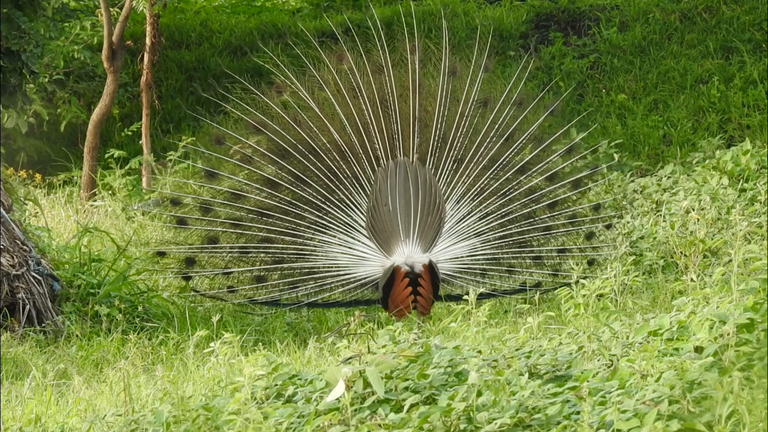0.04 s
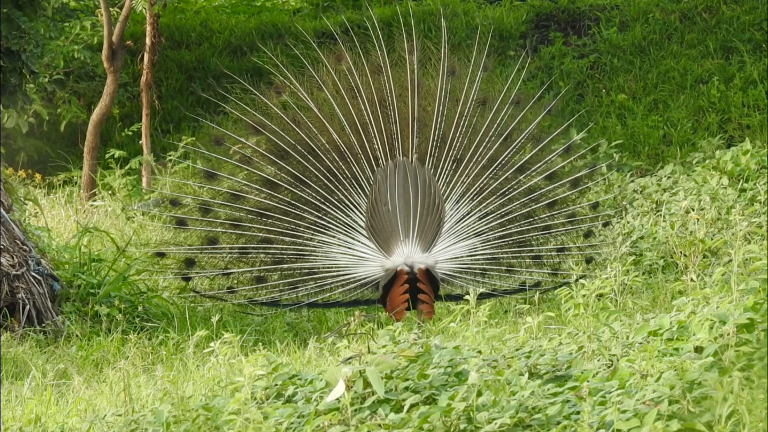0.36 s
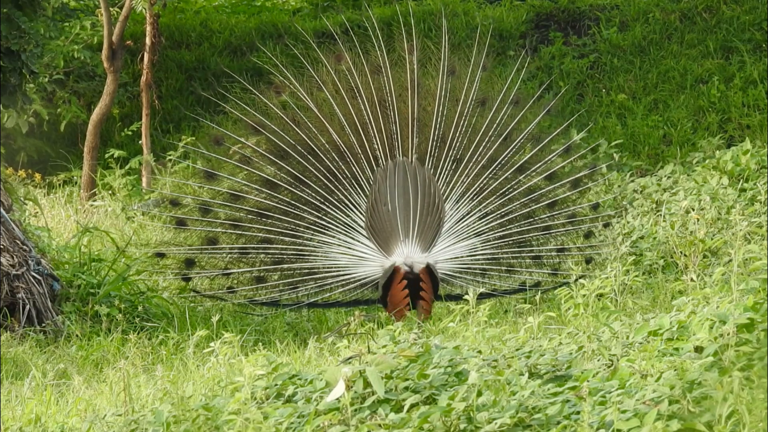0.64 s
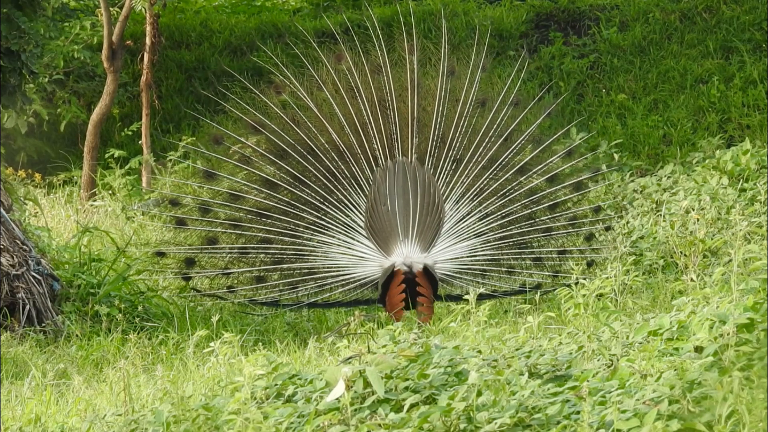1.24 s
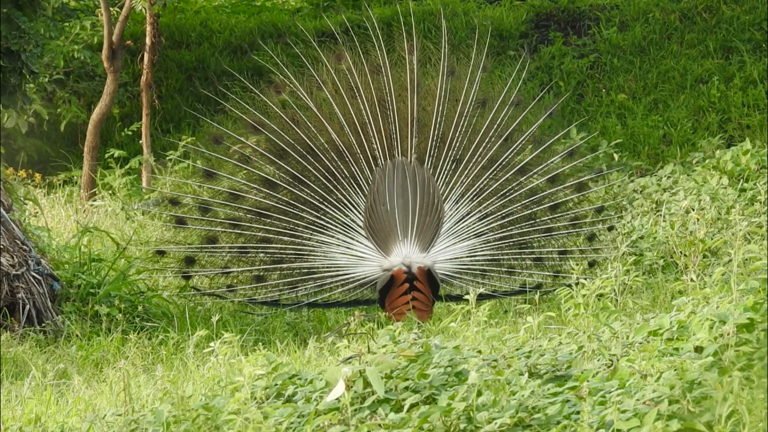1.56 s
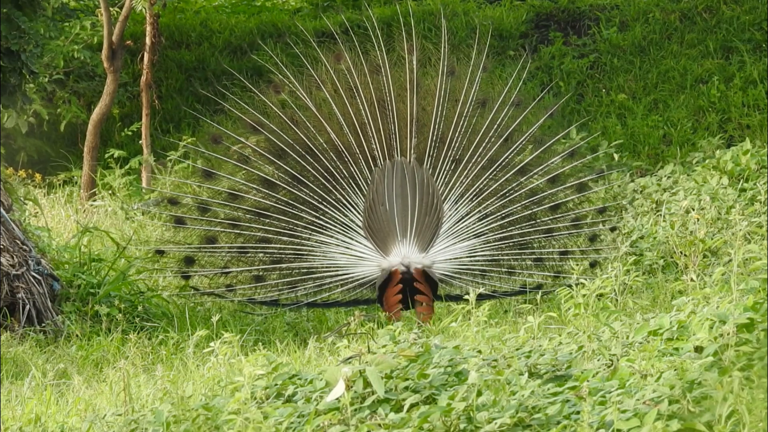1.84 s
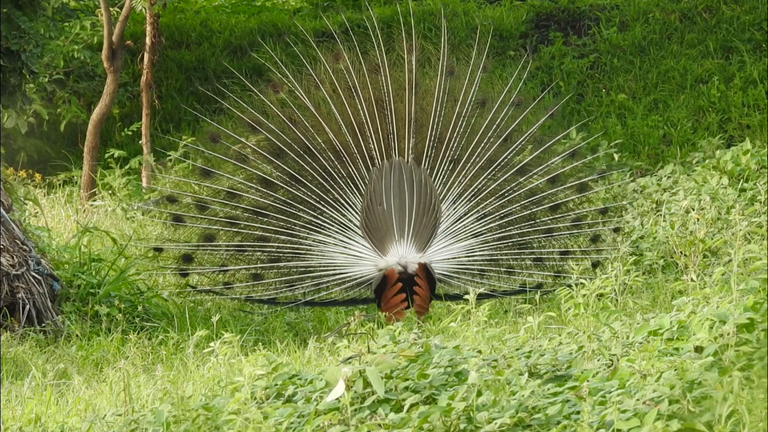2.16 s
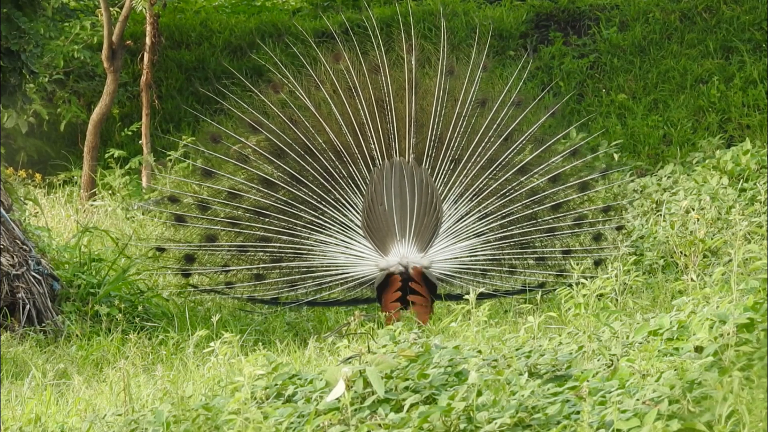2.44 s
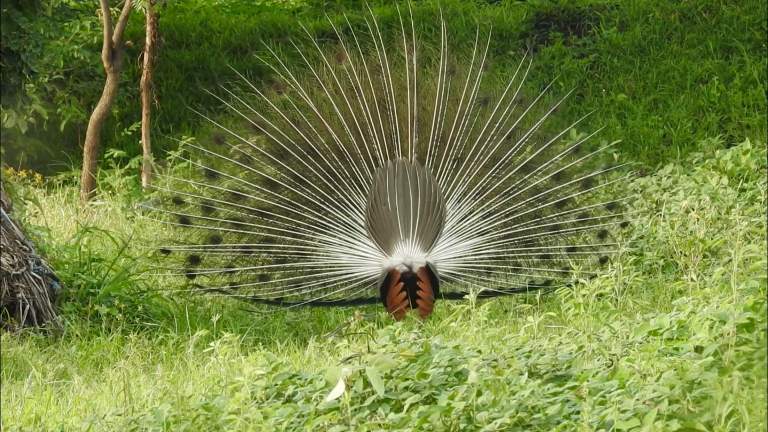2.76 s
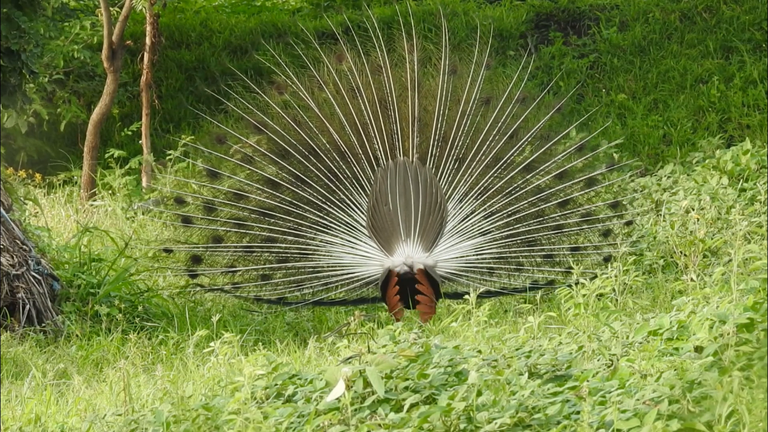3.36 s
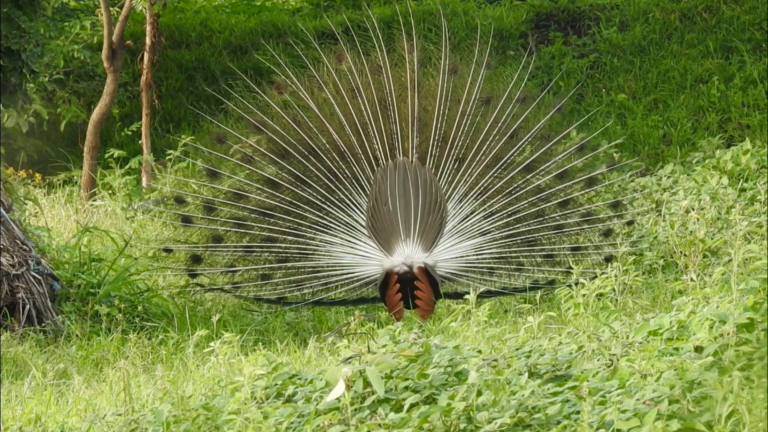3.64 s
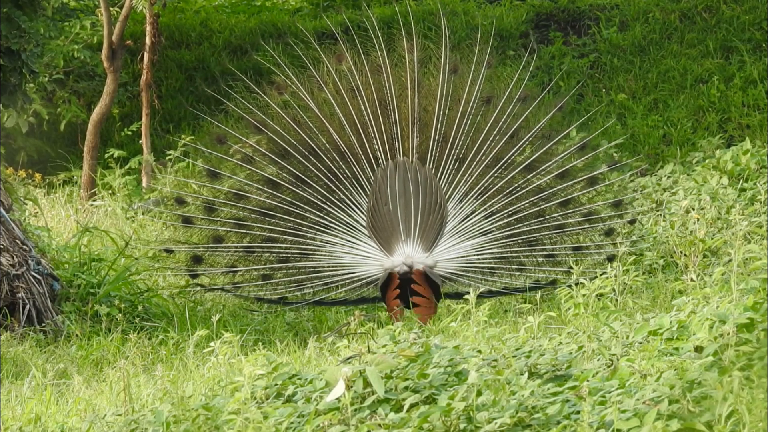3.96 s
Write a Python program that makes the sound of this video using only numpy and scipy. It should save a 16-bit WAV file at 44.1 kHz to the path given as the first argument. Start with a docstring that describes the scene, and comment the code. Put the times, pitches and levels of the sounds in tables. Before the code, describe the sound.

A peacock's fanned feathers rustle, swish and tick, with one sharp snap midway, then settle. Behind them a distant engine thuds rapidly and fades, while insects hiss and a small bird repeats falling notes. Stereo, in a meadow.

```python
"""A peacock holds up its fanned train in a meadow; its feathers rustle and now and then swish or snap.
Far off something thuds about 17 times a second, most likely a single-cylinder engine,
speeding up a little as it fades. Insects hiss and trill in the grass over a faint low rumble,
and a small bird repeats soft falling notes. Two spaced microphones listen."""
import sys
import numpy as np
from scipy import signal
from scipy.fft import rfft, irfft
from scipy.io import wavfile

SR = 44100
rng = np.random.default_rng(int(sys.argv[2]) if len(sys.argv) > 2 else 0)


def wav_record(signal):
    """Record a signal, one row per channel, as 16-bit PCM in the file named by sys.argv[1]."""
    frames = np.transpose(np.atleast_2d(signal))
    bounded = np.clip(frames, -1, 1)
    # unit amplitude maps onto the largest positive 16-bit level
    quanta = np.round(bounded * 32767).astype(np.int16)
    wavfile.write(sys.argv[1], SR, quanta)


N = 176400
T = np.arange(N) / SR  # time of each sample [s]
FREQS = np.arange(N // 2 + 1) * SR / N  # frequency of each point in a spectrum [Hz]


def from_db(db):
    """Turn decibels into a number to multiply by."""
    return 10 ** (np.asarray(db) / 20)


def unit_power(x):
    """Scale a sound so that its average power is 1."""
    return x / np.sqrt(np.mean(x ** 2) + 1e-20)


def over_time(rows):
    """Join a table's timed rows with straight lines: one curve for each value column."""
    times, *columns = np.transpose(rows)
    return [np.interp(T, times, column) for column in columns]


def over_frequency(rows):
    """Join (frequency, value) rows with straight lines on a log-frequency axis."""
    hz, value = np.transpose(rows)
    return np.interp(np.log(FREQS + 1), np.log(hz), value)


def drift(rate_hz):
    """A smooth random wobble of about size 1; a higher rate wobbles faster."""
    step, warm_up = 40, 2000
    pole = np.exp(-2 * np.pi * rate_hz * step / SR)
    white = rng.standard_normal(N // step + warm_up + 2)
    slow = signal.lfilter([1], [1, -2 * pole, pole * pole], white)[warm_up:]
    return np.interp(np.arange(N) / step, np.arange(len(slow)), unit_power(slow))


def keep_band(x, hz, kind, order):
    """Let only the lows, the highs or one band through."""
    return signal.sosfilt(signal.butter(order, hz, kind, fs=SR, output="sos"), x + 1e-18)


def ring(x, hz, *widths_hz):
    """Make a sound ring at one pitch, once for each width; narrower rings longer."""
    for width in widths_hz:
        x = signal.lfilter(*signal.iirpeak(hz, hz / width, SR), x + 1e-18)
    return x


def stroke(start, attack, decay):
    """A loudness curve that rises quickly, then dies away."""
    age = T - start
    return np.clip(age / attack, 0, 1) * np.exp(-np.clip((age - attack) / decay, 0, 30))


def colour(source, spectrum):
    """Turn two unrelated signals into a partly alike left and right with this spectrum."""
    # how alike the two microphones sound: (frequency [Hz], likeness [0-1])
    likeness = [(100, .99), (500, .98), (1300, .95), (2400, .76), (4500, .6), (7000, .62), (12000, .55)]
    alike = over_frequency(likeness)
    high_fade = 1 / (1 + (FREQS / spectrum[-1][0] / 2) ** 4)
    low_fade = 1 / (1 + (spectrum[0][0] / 2 / (FREQS + 1)) ** 4)
    mid, side = rfft(source) * from_db(over_frequency(spectrum)) * high_fade * low_fade
    pair = np.sqrt(1 + alike) * mid + np.sqrt(1 - alike) * side * [[1], [-1]]
    return unit_power(irfft(pair, N))


def noise(spectrum):
    """Smooth stereo noise with this spectrum."""
    return colour(rng.standard_normal((2, N)), spectrum)


def spread(mid, side, side_db):
    """A sound that arrives by many paths differs a little between the microphones."""
    return mid + from_db(side_db) * side * np.array([[1], [-1]])


def leaf_echo(x, fade_s):
    """Leaves and trunks give back a blurred echo that falls 60 dB in fade_s."""
    tail = unit_power(rng.standard_normal(N) * from_db(-60 * T / fade_s)) / np.sqrt(N)
    return signal.fftconvolve(x, tail)[:N]


def left_late(pair, lag_s):
    """A sound from the right of centre reaches the left microphone later."""
    left, right = np.broadcast_to(pair, (2, N))
    delay = np.exp(-2j * np.pi * FREQS * lag_s)
    return np.array([irfft(rfft(left) * delay, N), right])


def feather_rustle():
    """Vanes, the soft flat parts of feathers, rub in a hiss dotted with tiny ticks."""
    # tone of the rustle: (frequency [Hz], relative level [dB])
    spectrum = [(2500, -8.5), (3900, -6), (4200, 2.5), (5200, -3.5), (6300, 3), (7200, -3.5), (8200, -7.5),
                (10000, -15.5), (12000, -29.5), (15000, -92)]
    # how much the train stirs: (time [s], level [dB])
    stir = [(0, -38), (.13, -38), (.38, -40), (.6, -37.5), (.85, -44), (1.06, -35.5), (1.3, -46.5),
            (1.55, -44.5), (1.78, -42), (2, -41), (2.13, -48.5), (2.42, -43.5), (2.6, -42.5), (2.75, -48),
            (3.3, -61), (4, -76)]
    ticks_per_s, tick_gain = 260, 0.28
    ticks = rng.standard_normal((2, N)) * (rng.random(N) < ticks_per_s / SR)
    level = from_db(over_time(stir)[0] + 0.86 * drift(5.7))
    return level * (noise(spectrum) + tick_gain * colour(ticks, spectrum))


def feather_shafts():
    """Stiff shafts tap each other at random and ring; now and then one rubs harder."""
    # pitches the shafts ring at: (pitch [Hz], width [Hz], relative level [dB])
    pitches = [(824, 140, -19), (1250, 72, 3), (1393, 61, -0.5), (1534, 200, 1), (1725, 40, 0.5),
               (1970, 30, -3), (2112, 100, 2.5), (2523, 31, -1)]
    # loudness of the rattling: (time [s], level [dB])
    rattle_level = [(0, -50), (1.4, -48), (2.2, -45.5), (2.8, -48), (4, -60)]
    # harder rubs: (time [s], attack [s], decay [s], pitch [Hz], width [Hz], level [dB])
    rubs = [(0.048, 0.013, 0.096, 1960, 410, -37.5), (0.309, 0.02, 0.072, 870, 300, -43.5),
            (.562, 0.022, 0.01, 2210, 220, -33.5), (0.944, 0.0054, 0.01, 1300, 222, -31.5),
            (1.753, .002, 0.015, 2130, 298, -34), (1.769, .0016, 0.023, 1250, 400, -39.5),
            (2.246, 0.0058, 0.016, 1460, 700, -34), (2.4965, 0.0065, 0.02, 1890, 170, -30),
            (2.541, 0.0018, 0.028, 1830, 260, -31), (2.756, 0.011, 0.024, 1530, 300, -38),
            (3.027, 0.0031, 0.044, 2960, 900, -41), (3.444, 0.0037, .011, 1125, 220, -39.5)]
    taps_per_s = 260
    taps = rng.random(N) < taps_per_s / SR
    rattle = 0
    for hz, width, db in pitches:
        tone = ring(taps * rng.standard_normal(N), hz, width, hz / 2)
        rattle += from_db(db) * unit_power(tone)
    out = from_db(over_time(rattle_level)[0]) * unit_power(rattle)
    for start, attack, decay, hz, width, db in rubs:
        tone = ring(rng.standard_normal(N), hz, width, 2 * width)
        out += from_db(db) * stroke(start, attack, decay) * unit_power(tone)
    return out


def insects():
    """Insects hiss steadily, with a narrow trill and one thin whine standing out."""
    # tone of the hiss: (frequency [Hz], relative level [dB])
    spectrum = [(3000, -9), (3900, -8), (4300, 1), (5200, -0.5), (6000, 5.5), (6600, 5.5), (7200, 4),
                (8000, -9), (9200, -8.5), (10500, -14.5), (12000, -39.5)]
    # loudness of one insect's whine: (time [s], level [dB])
    whine_level = [(2.6, -53), (3.05, -46), (3.25, -50), (3.41, -37), (3.5, -48)]
    pitch_hz = 6530
    trill_shape = [(-320, -60), (-80, -4), (0, 0), (80, -4), (320, -60)]  # (offset [Hz], level [dB])
    trill = from_db(-49.5) * noise([(pitch_hz + offset, db) for offset, db in trill_shape])
    whine = np.sin(2 * np.pi * np.cumsum(pitch_hz + 40 * drift(40)) / SR)
    whine *= from_db(over_time(whine_level)[0] + 2 * drift(22))
    hiss = from_db(-40 + drift(7)) * noise(spectrum)
    return hiss + trill + whine


def low_rumble():
    """A faint, steady rumble lies under everything."""
    # tone of the rumble: (frequency [Hz], relative level [dB])
    spectrum = [(20, -25), (45, -7), (100, 8), (200, 10), (350, -11), (600, -42)]
    return from_db(-47.5) * noise(spectrum)


def engine_clatter(cycles):
    """A far ringing clatter throbs with the firings and changes tone as the engine fades."""
    # loudness of its two tone colours: (time [s], early level [dB], late level [dB])
    colour_levels = [(0, -45.5, -74), (.6, -45, -53), (1.4, -51, -58), (2.2, -46.5, -72),
                     (2.45, -55.5, -44), (2.8, -52, -52), (3.2, -61, -47), (4, -72, -42)]
    # pitches it rings at: (pitch [Hz], gain in early colour [dB], gain in late colour [dB])
    pitches = [(388, -1.5, -23), (477.8, 7, 1), (550, -4.5, -10), (668, -2.5, 4.5), (783, -1, -34),
               (1250, 5.5, -9), (1391, -2, -1.5), (1872, -13, -0.5), (2155, 2, -1.5), (2630, -7, -27)]
    # broad noise under the ringing: (frequency [Hz], relative level [dB])
    wash = [(300, 1), (500, -7.5), (900, -7.5), (1300, -2), (2100, -25), (3100, -9.5), (5000, -49)]
    width_hz, waver_db, throb_depth = 45, 2.5, 0.16
    early, late = from_db(over_time(colour_levels))
    ringing = 0
    for hz, early_db, late_db in pitches:
        shaking = spread(*rng.standard_normal((2, N)), side_db=-15.5)
        tone = unit_power(ring(shaking, hz, width_hz, hz / 5))
        level = np.hypot(early * from_db(early_db), late * from_db(late_db))
        ringing += tone * level * from_db(waver_db * drift(10.5))
    clatter = ringing / np.sqrt(len(pitches)) + from_db(-51) * noise(wash)
    return clatter * (1 + throb_depth * np.cos(2 * np.pi * (cycles - .13)))


def engine_exhaust(cycles):
    """Each firing draws a little air, then puffs through muffler and pipe; some knock harder."""
    # strength of the puffs: (time [s], level [dB])
    puff_level = [(0, -14.5), (.8, -16.5), (1.8, -18.5), (2.5, -20.5), (4, -22.5)]
    # firings that knock hard: (rough time [s], level [dB])
    hard_knocks = [(.205, -30), (.45, -29), (.51, -28.5), (.63, -27.5), (1.265, -28.5), (1.325, -27),
                   (1.615, -31.5), (1.79, -29.5), (2.135, -26.5), (2.625, -27.5), (2.9, -31), (3.005, -28),
                   (3.06, -29), (3.11, -27), (3.535, -32.5)]
    jitter_s, puff_spread_db, knock_spread_db, inrush_lead_s = .0003, .8, 4, .007
    pipe_hz, pipe_width_hz, knock_hz, knock_width_hz = 168, 72, 304, 177
    firings = np.interp(np.arange(int(cycles[-1]) + 1), cycles, T)
    time_luck, puff_luck, knock_luck = rng.standard_normal((len(firings), 3)).T
    at = np.clip(((firings + jitter_s * time_luck) * SR).astype(int), 0, N - 1)
    puffs, knocks = np.zeros((2, N))
    puffs[at] = from_db(over_time(puff_level)[0][at] + puff_spread_db * puff_luck)
    knocks[at] = puffs[at] * from_db(-24 + knock_spread_db * np.minimum(knock_luck, 2))
    for when, db in hard_knocks:
        nearest = np.argmin(np.abs(firings - when))
        knocks[at[nearest]] = from_db(db)
    inrush = from_db(-15) * np.interp(T + inrush_lead_s, T, puffs)
    # Shape one thud and one knock from a click, then play them at every firing.
    click = 1. * (T == 0)
    muffled = keep_band(keep_band(click, 222, "low", order=6), 80, "high", order=6)
    thud = ring(muffled, pipe_hz, pipe_width_hz)
    dull_click = keep_band(click, 0.933 * knock_hz, "low", order=4)
    knock = ring(dull_click, knock_hz, knock_width_hz, knock_width_hz)
    thudding = signal.fftconvolve(puffs - inrush, thud / np.abs(thud).max())[:N]
    knocking = signal.fftconvolve(knocks, knock / np.abs(knock).max())[:N]
    return thudding + knocking


def far_engine():
    """The engine thuds and clatters at one shared pace; the trees echo its exhaust."""
    # engine speed: (time [s], firing rate [1/s])
    speed = [(0.0, 16.253), (0.375, 16.25), (0.75, 17.442), (0.875, 15.868), (1.0, 18.05), (1.25, 17.23),
             (1.625, 16.905), (1.75, 17.397), (2.125, 17.651), (2.5, 18.844), (2.75, 18.315),
             (3.625, 19.113), (3.875, 18.417), (4.0, 20.282)]
    # echoes off the trees: (delay [s], gain [dB])
    tree_echoes = [(0.0117, -18.5), (0.026, -29)]
    first_firing_s = .0101
    cycles = np.cumsum(over_time(speed)[0]) / SR  # goes up by 1 with each firing
    cycles -= np.interp(first_firing_s, T, cycles)
    direct = engine_exhaust(cycles)
    echoes = sum(from_db(db) * np.interp(T - delay, T, direct, left=0) for delay, db in tree_echoes)
    blur = spread(leaf_echo(direct, fade_s=.3), leaf_echo(direct, fade_s=.3), side_db=-0.5)
    return direct + echoes + from_db(-23.5) * blur + engine_clatter(cycles)


def small_bird():
    """A bird sings thin notes that slide downward and echo off the leaves."""
    # its notes: (time [s], level [dB])
    notes = [(.085, -41), (.145, -41), (.205, -39), (.972, -39), (1.033, -40), (1.093, -38), (1.935, -38),
             (1.998, -37), (2.715, -44), (2.77, -39), (2.828, -37), (2.889, -36), (2.952, -38),
             (3.695, -44), (3.754, -38), (3.818, -36.5), (3.876, -36.5)]
    note_s, start_hz, end_hz = .052, 5830, 5080
    waver_hz = 85 * drift(142)
    song = np.zeros(N)
    for start, db in notes:
        progress = np.clip((T - start) / note_s, 0, 1)
        hz = start_hz + (end_hz - start_hz) * progress + waver_hz
        swell = from_db(db) * np.sqrt(2) * np.sin(np.pi * progress)
        song += swell * np.sin(2 * np.pi * np.cumsum(hz) / SR)
    return song + from_db(-6) * leaf_echo(song, fade_s=.18)


def feather_swishes():
    """Hard quills and soft vanes sound together in short, grainy swishes."""
    # swishes: (time [s], attack [s], decay [s], quill level [dB], vane level [dB])
    swishes = [(0.283, 0.0015, 0.0068, -34, -33), (0.534, 0.0042, 0.011, -38, -30.5),
               (0.576, 0.002, 0.014, -31, -29.5), (0.596, 0.0022, 0.016, -33.5, -42),
               (0.741, 0.0024, 0.039, -37, -32.5), (0.943, 0.0014, 0.018, -44, -24.5),
               (1.641, .002, 0.0064, -49, -33.5), (1.754, 0.00087, 0.02, -32, -31.5),
               (1.885, 0.0055, 0.013, -30, -21), (2.079, 0.002, 0.032, -56, -26),
               (2.227, 0.0046, 0.0093, -27, -30), (2.25, .003, 0.015, -30.5, -32.5),
               (2.284, .002, 0.031, -35, -34), (2.494, .001, 0.017, -28, -37),
               (2.542, .003, 0.02, -29.5, -30.5)]
    # tone of the quills: (frequency [Hz], relative level [dB])
    quill_spectrum = [(500, 1), (900, 1), (1300, 14), (1550, -5), (1900, 12.5), (2300, 9), (3000, 2),
                      (7000, 8), (10000, -5), (14000, -19)]
    # tone of the vanes: (frequency [Hz], relative level [dB])
    vane_spectrum = [(2500, -5.5), (3800, -4.5), (4600, 5.5), (6500, 5.5), (7500, 0.5), (8500, -16),
                     (11000, -19), (15000, -82)]
    quill_level, vane_level = np.zeros((2, N))
    for start, attack, decay, quill_db, vane_db in swishes:
        swell = stroke(start, attack, decay)
        quill_level += from_db(quill_db) * swell
        vane_level += from_db(vane_db) * swell
    grain = unit_power(from_db(3 * drift(330)))  # a fast flutter in loudness
    return grain * (quill_level * noise(quill_spectrum) + vane_level * noise(vane_spectrum))


def quill_snaps():
    """A quill slips and snaps in a short bright burst."""
    # snaps: (time [s], level [dB], low edge [Hz], high edge [Hz], decay [s])
    snaps = [(2.0905, -11, 4570, 6700, 0.0013), (2.093, -11, 4460, 6800, 0.0016),
             (2.12, -30, 4170, 7600, 0.0029), (3.016, -24, 6200, 8600, 0.0032),
             (3.029, -28.5, 5600, 7600, 0.0059), (3.399, -31.5, 2840, 5600, 0.0016),
             (3.9219, -24.5, 3050, 7100, 0.0019)]
    out = 0
    for start, db, low_hz, high_hz, decay in snaps:
        band_share = (high_hz - low_hz) / (SR / 2)  # share of the power that the filter keeps
        burst = rng.standard_normal(N) * stroke(start, .0002, decay) / np.sqrt(band_share)
        out += from_db(db) * keep_band(burst, [low_hz, high_hz], "band", order=3)
    return out


def scene():
    """The whole meadow, left and right."""
    meadow = far_engine() + feather_rustle() + feather_swishes() + feather_shafts()
    meadow += insects() + small_bird() + low_rumble()
    return left_late(meadow, lag_s=.000058) + left_late(quill_snaps(), lag_s=.000035)


def record(dry):
    """The right microphone is stronger in the middle range; the highest treble is cut."""
    # how much louder right is than left: (frequency [Hz], gain [dB])
    right_over_left = [(700, 0), (1200, 4), (2200, 3), (3300, 0), (4500, -1.3), (8000, -.4)]
    cutoff_hz = 15700
    lean = from_db(over_frequency(right_over_left) / 2)
    pair = irfft(rfft(dry) * np.array([1 / lean, lean]), N)
    return signal.sosfilt(signal.cheby2(12, 70, cutoff_hz, fs=SR, output="sos"), pair)


dry = scene()
out = record(dry)
wav_record(out)
```